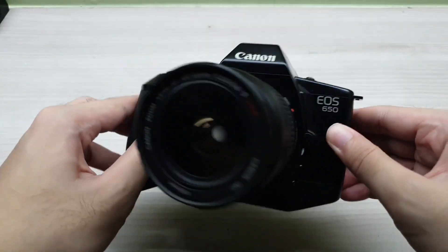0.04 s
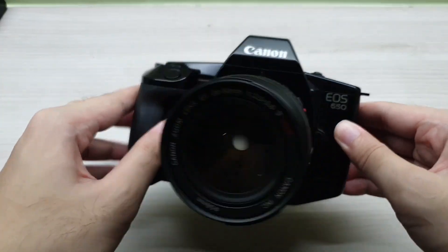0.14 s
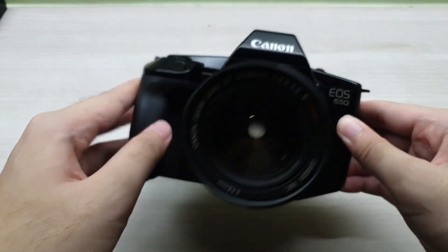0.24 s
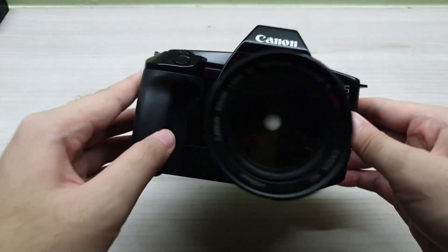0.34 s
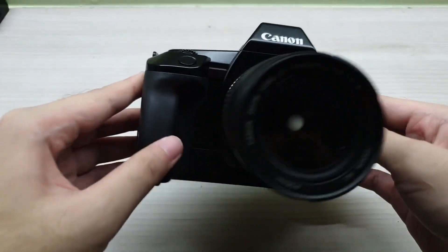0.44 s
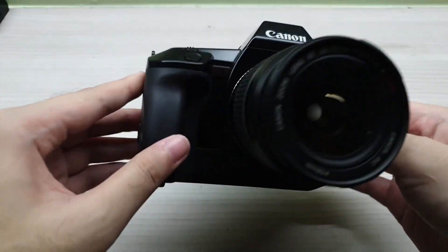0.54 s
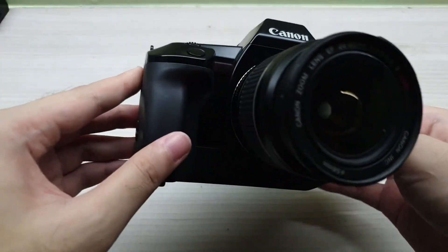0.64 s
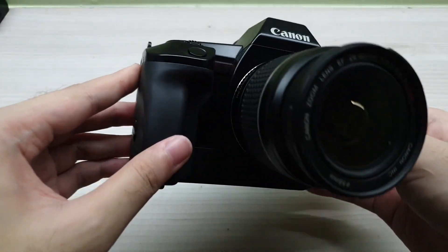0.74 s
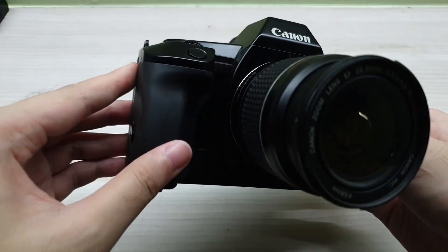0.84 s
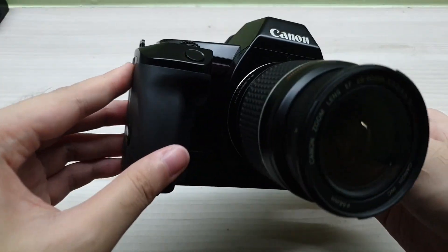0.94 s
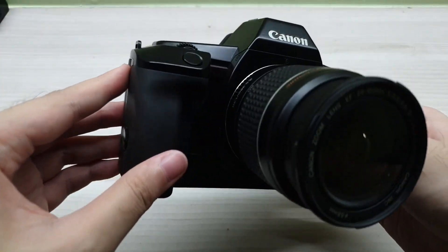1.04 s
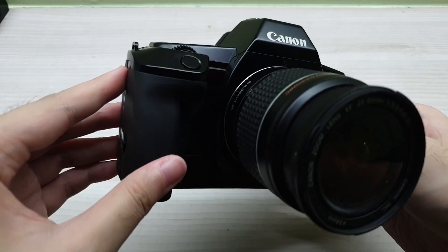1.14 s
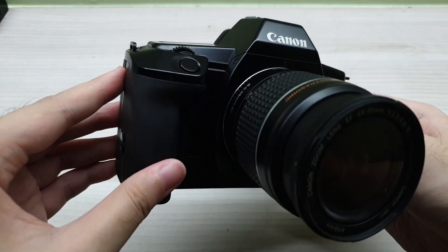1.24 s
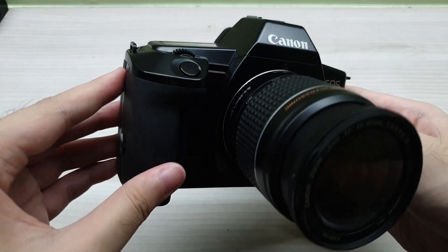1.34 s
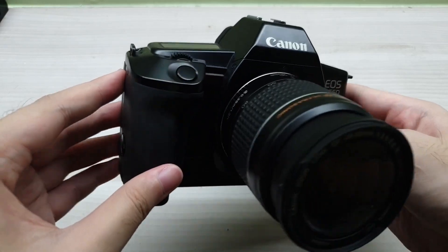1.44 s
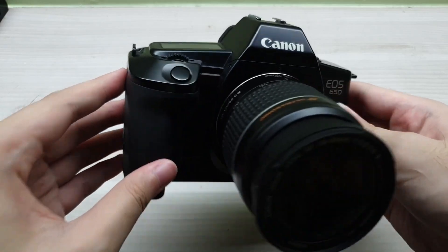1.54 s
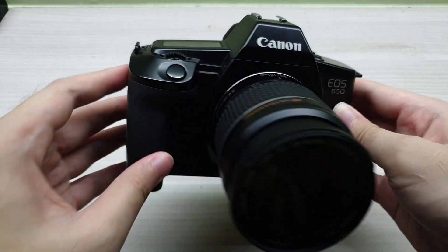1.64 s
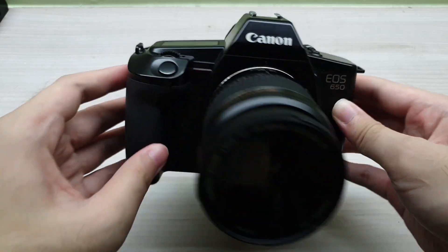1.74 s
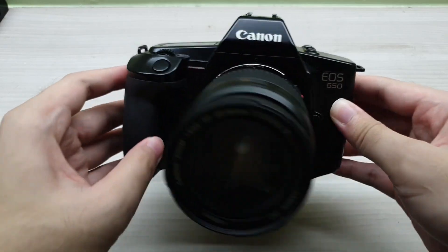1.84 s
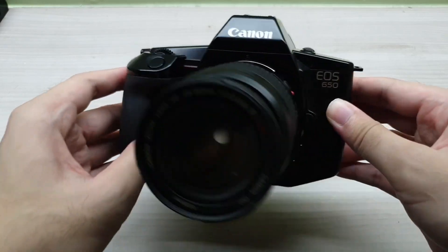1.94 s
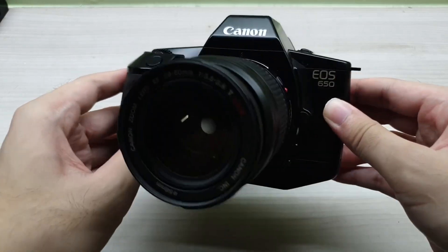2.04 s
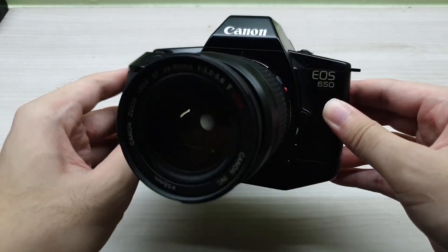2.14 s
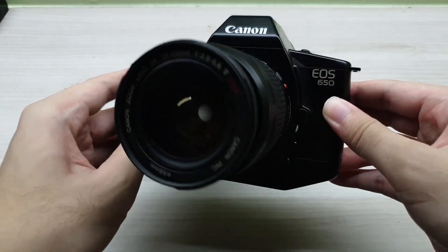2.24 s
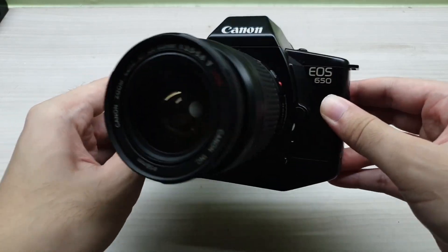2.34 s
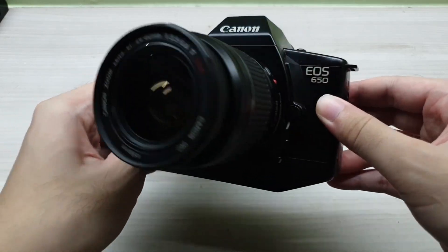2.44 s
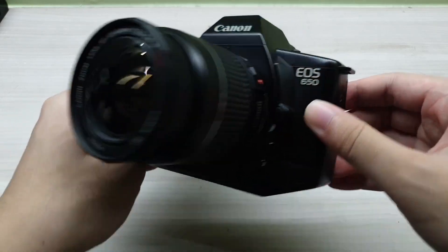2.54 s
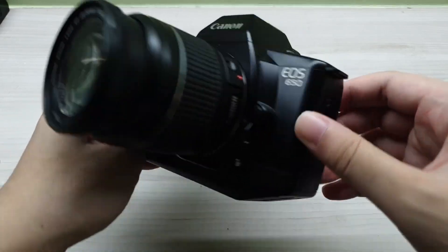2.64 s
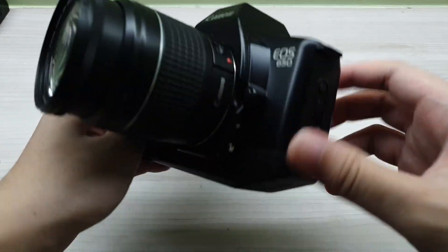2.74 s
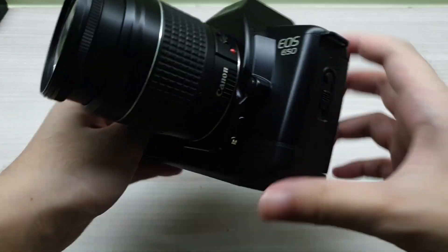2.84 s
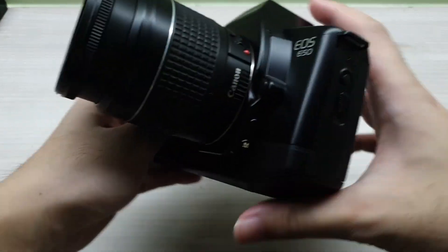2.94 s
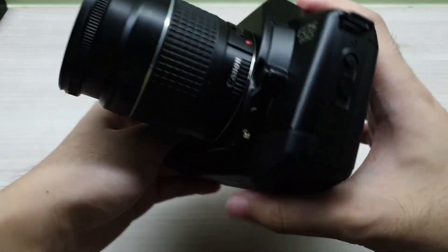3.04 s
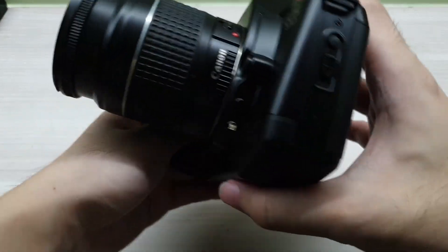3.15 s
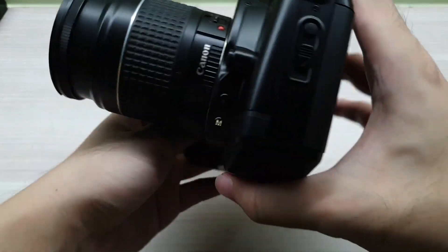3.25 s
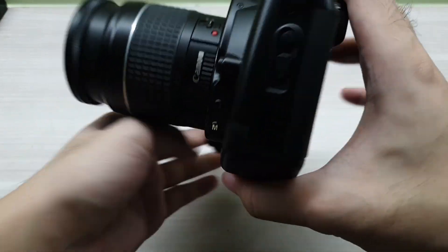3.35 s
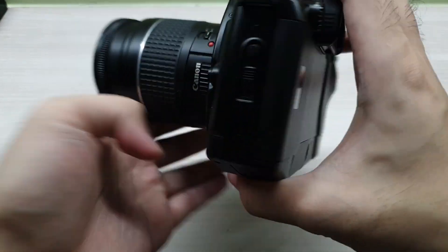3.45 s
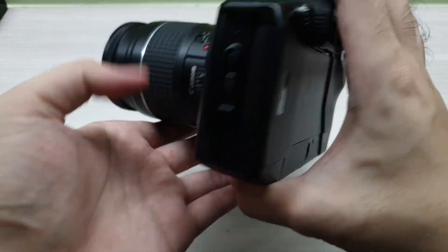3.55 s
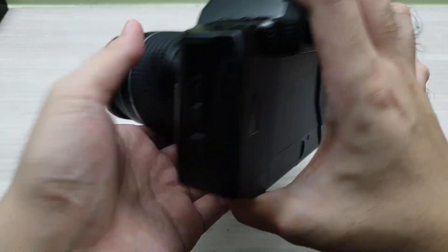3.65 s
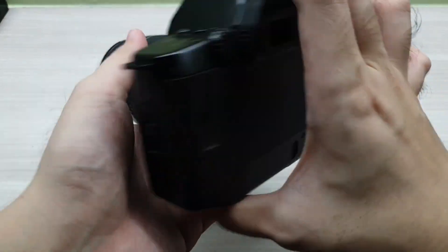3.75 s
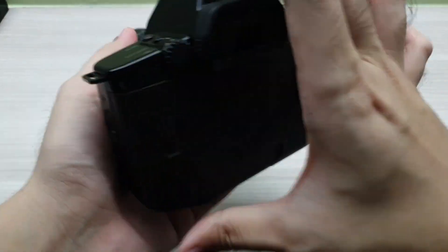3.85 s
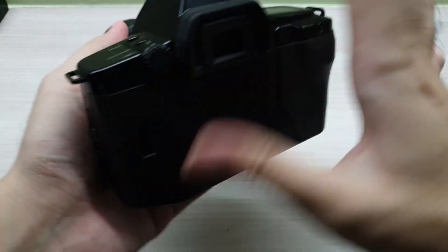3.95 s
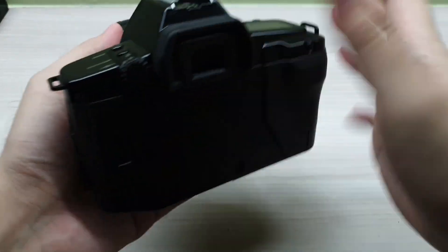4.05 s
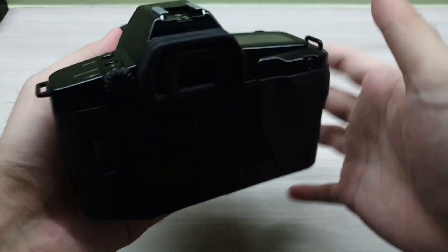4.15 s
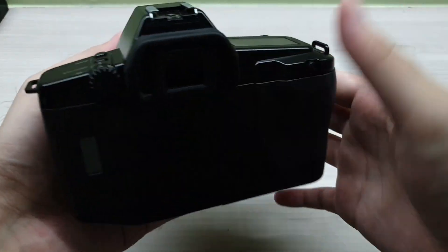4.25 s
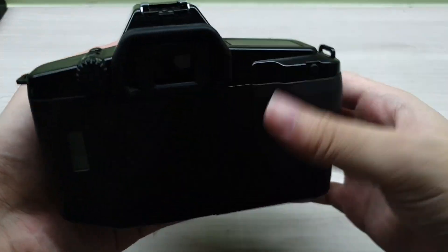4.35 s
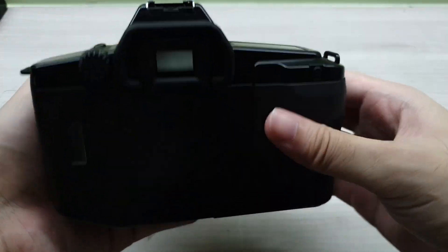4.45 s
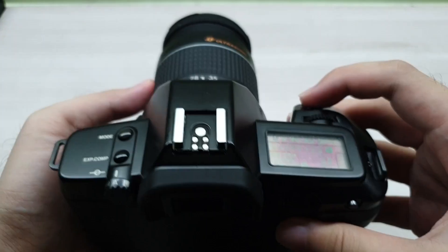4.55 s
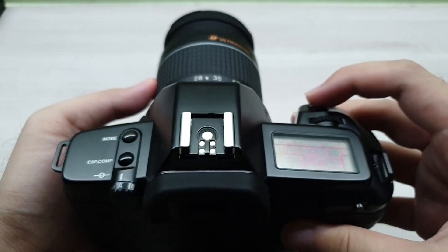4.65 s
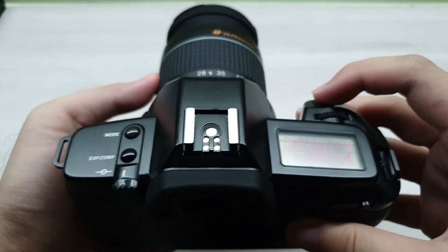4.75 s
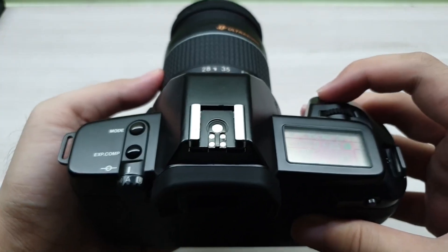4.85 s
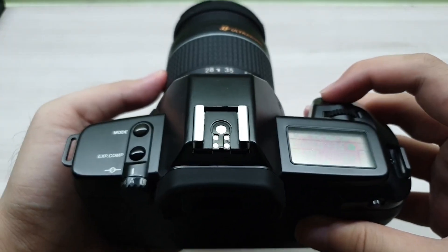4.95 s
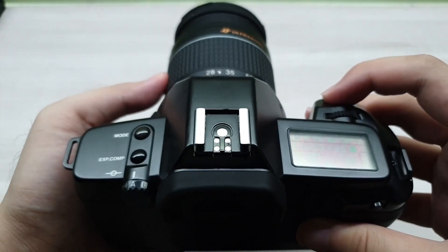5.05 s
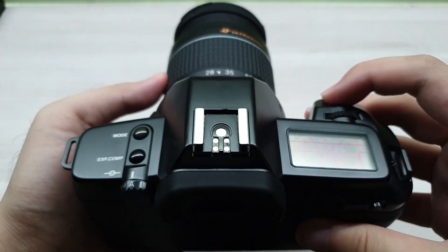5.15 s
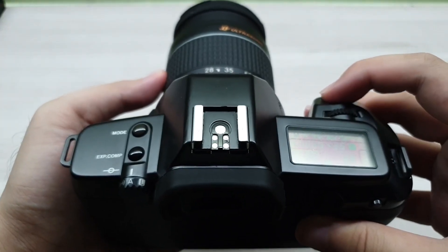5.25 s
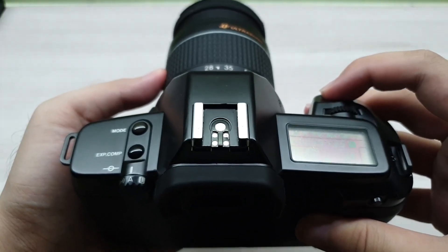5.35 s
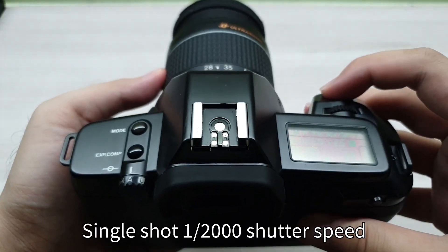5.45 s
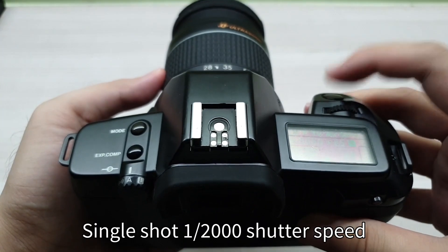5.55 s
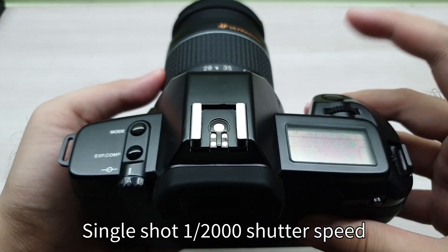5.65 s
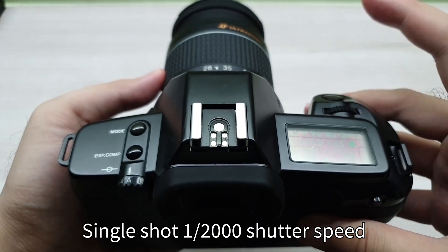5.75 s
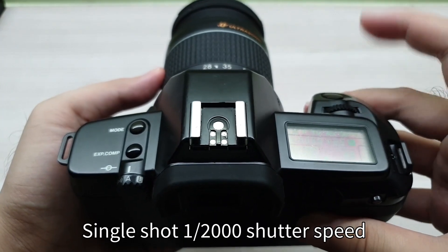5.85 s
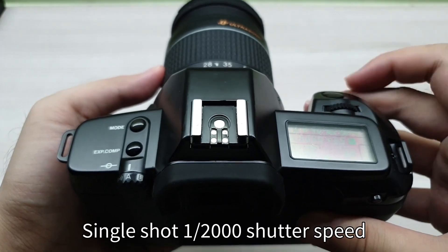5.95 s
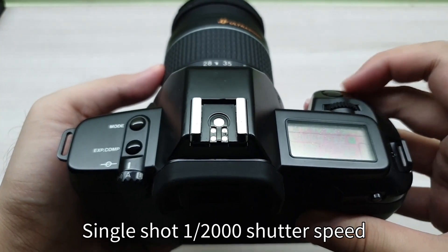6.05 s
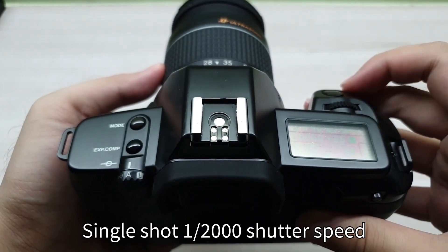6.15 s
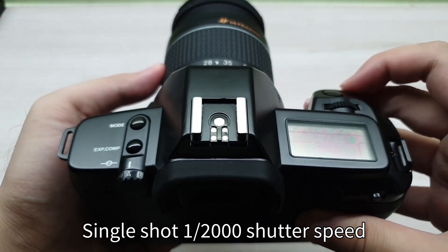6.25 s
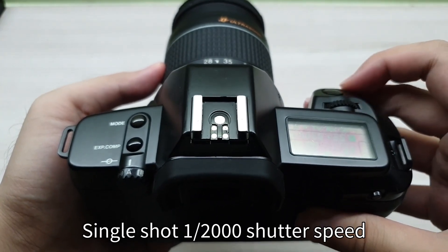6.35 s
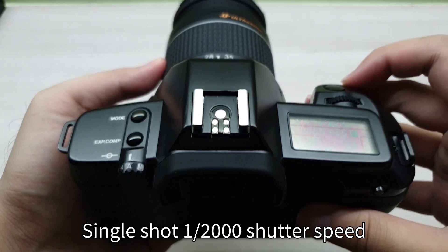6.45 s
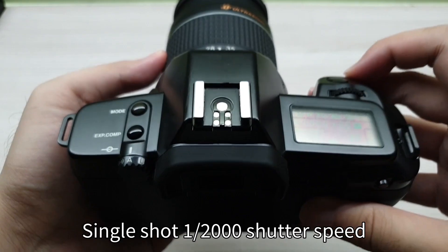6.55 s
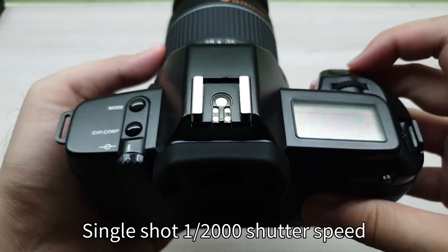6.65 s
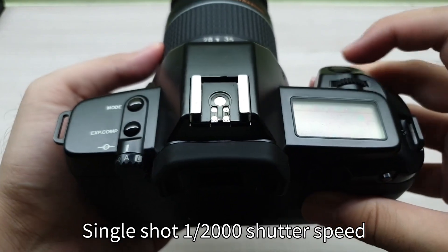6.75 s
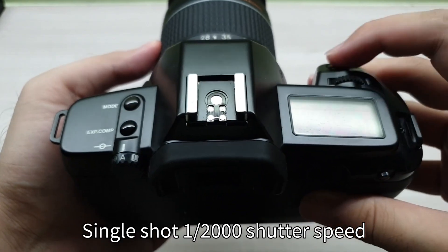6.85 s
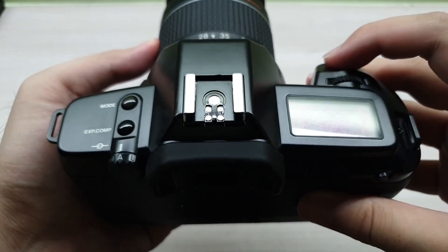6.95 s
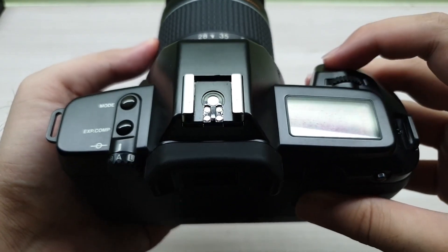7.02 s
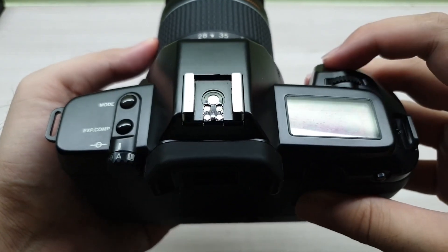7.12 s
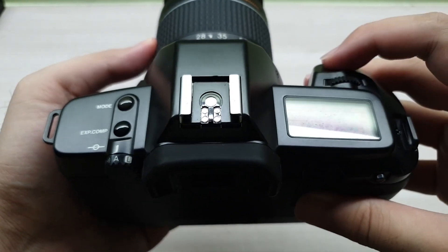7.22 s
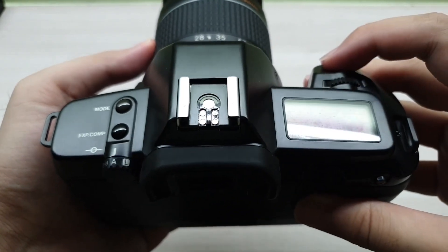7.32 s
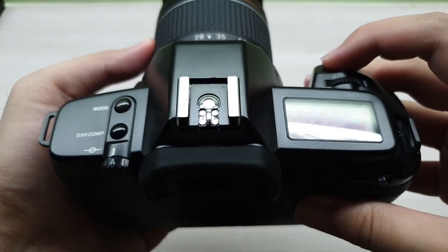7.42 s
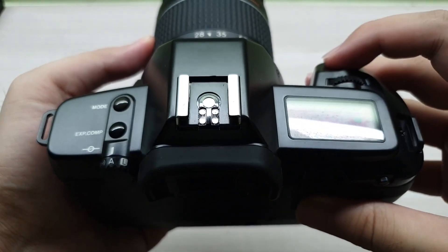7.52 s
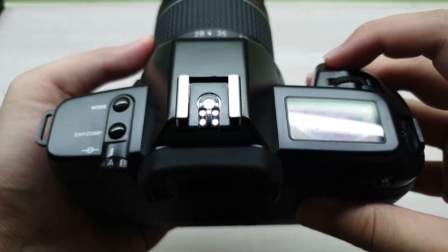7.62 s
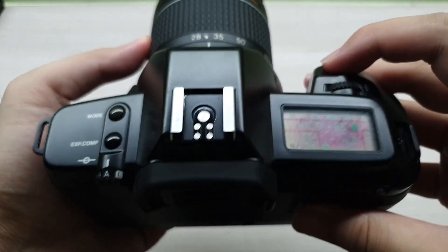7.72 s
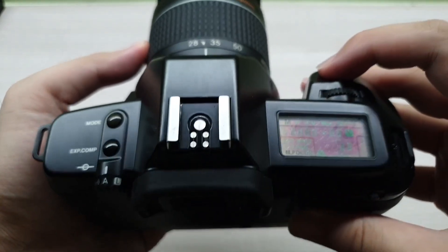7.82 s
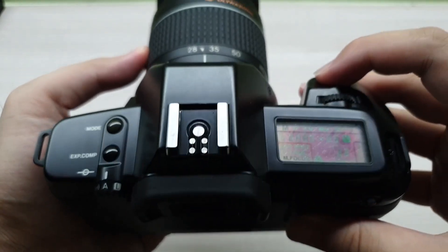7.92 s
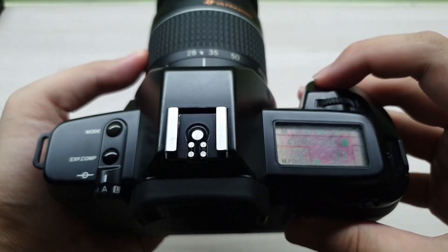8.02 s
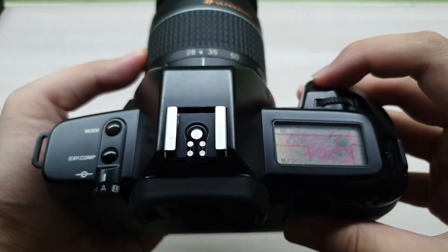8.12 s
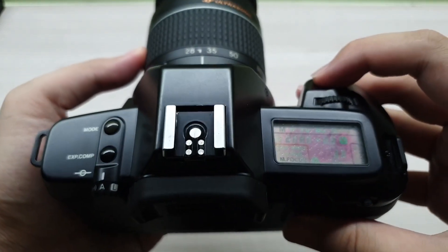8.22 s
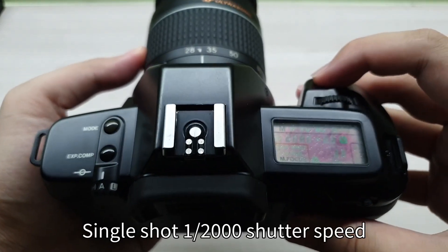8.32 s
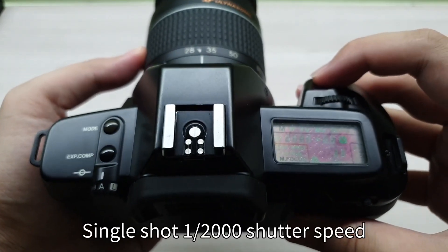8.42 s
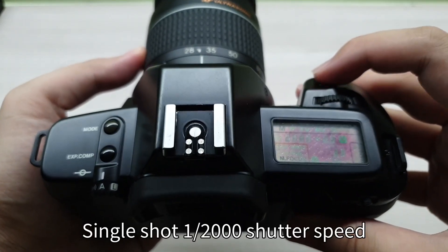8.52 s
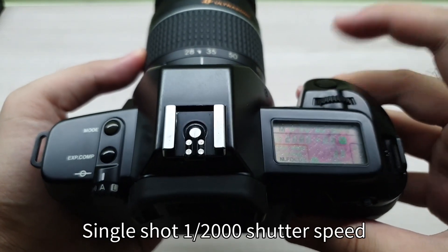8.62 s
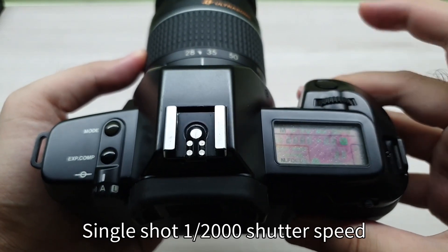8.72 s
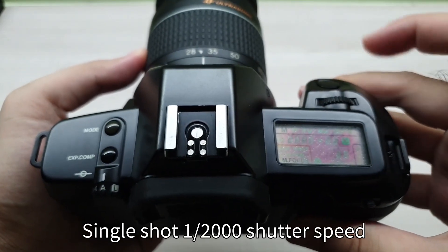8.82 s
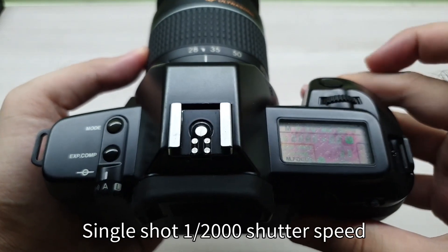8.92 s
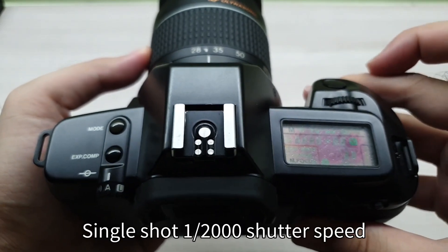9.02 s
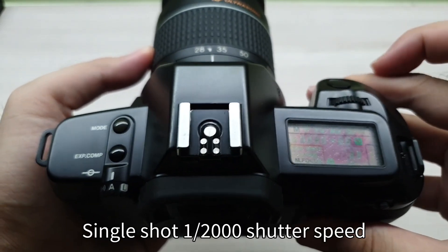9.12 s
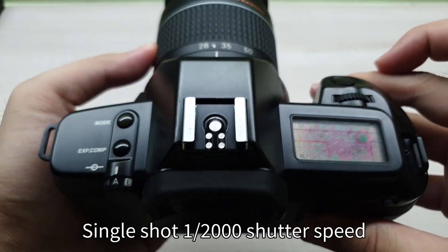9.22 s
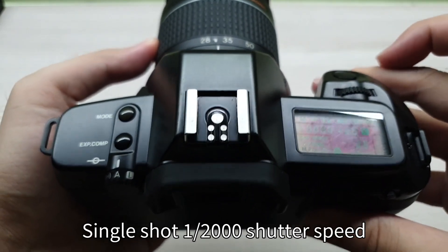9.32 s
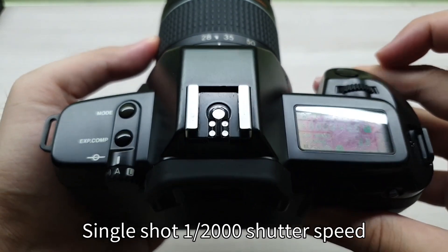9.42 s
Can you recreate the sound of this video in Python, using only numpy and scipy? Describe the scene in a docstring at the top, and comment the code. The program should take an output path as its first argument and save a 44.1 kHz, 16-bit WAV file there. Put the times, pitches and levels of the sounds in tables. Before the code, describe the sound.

A film camera is handled close to the microphone in a small, quiet room with faint steady air. A few soft finger ticks and low bumps come in the first half second, and another tap at about 1.2 seconds. From 2 to 5 seconds the handling gets busier: fingers click and knock on the hollow plastic body, most clearly around 2.6 seconds, and skin rasps briefly over the grip between 2.8 and 4 seconds, ending with soft, deep bumps.

At about 5.4 seconds the camera fires, much louder: a rapid cluster of sharp mirror and shutter clacks overlaps a small geared motor whirring the film on, all within about a third of a second. Light taps follow near 6.1 and 6.8 seconds. At about 8.4 seconds a second, matching clack and whir sounds, with a slight short echo, leaving only faint room air.

```python
"""Fingers tick and slide on plastic in a small, quiet room; then a film camera clacks and whirs, twice.
The camera is turned over in the hands, close to the microphone: touches knock its hollow body,
skin rasps over the grip, and faint room air runs underneath. In each shot a latch trips, the mirror
swings up, the shutter snaps, the mirror drops back, and a small geared motor winds the film on."""
import sys
import numpy as np
from scipy import signal
from scipy.fft import rfft, irfft
from scipy.io import wavfile
from scipy.ndimage import uniform_filter1d

SR = 44100
rng = np.random.default_rng(int(sys.argv[2]) if len(sys.argv) > 2 else 0)


def generate_wav(signal):
    """Clip the signal to [-1, 1] and save it as 16-bit WAV at the path in sys.argv[1]."""
    frames = np.transpose(np.atleast_2d(signal))
    scaled = np.clip(frames, -1, 1) * 32767
    pcm = np.round(scaled).astype(np.int16)
    wavfile.write(sys.argv[1], SR, pcm)


N = 417911
T = np.arange(N) / SR
HIT = T[:8192]  # a short time axis, enough for one hit

# the notes the camera body rings at: (pitch [Hz], relative level [dB], time to fade by 60 dB [s])
BODY_NOTES = [(412, -8, 0.094), (545, -8, 0.081), (672, -6.5, .04), (955, -9.5, 0.04), (1130, -7, 0.069),
              (2310, -1.5, 0.035), (2670, -2.5, .045), (3150, -6.5, .04), (3720, 0, 0.015),
              (4400, -2.5, .04), (6100, -4.5, .05), (6450, -2, 0.044), (7200, -3.5, .05), (9340, -2, 0.03)]
# the two shots: (time [s], relative level [dB])
SHOTS = [(5.3934, -0.5), (8.3529, -0.5)]


def undb(db):
    """Turn decibels into a number to multiply by."""
    return 10 ** (np.asarray(db) / 20)


def unit(x):
    """Scale a sound to an average (rms) level of 1."""
    return x / np.sqrt(np.mean(x ** 2))


def unit_hit(x):
    """Scale a hit to the energy of 4 ms at full level."""
    return x * np.sqrt(.004 * SR / np.sum(x ** 2))


def add(out, s, x):
    """Mix x into out, starting at s seconds."""
    i = int(s * SR)
    out[i:i + len(x)] += x[:N - i]


def noise(size):
    """White noise: an even hiss."""
    return rng.standard_normal(size)


def envelope(attack_s, hold_s, release_s):
    """A loudness shape: rise, hold, then fall by 20 dB in every release time."""
    t = T[:int((attack_s + hold_s + 3 * release_s) * SR)]
    return np.minimum(t / attack_s, 1) * undb(-20 * np.maximum(t - attack_s - hold_s, 0) / release_s)


def colour(x, points):
    """Shape the bass and treble of x along a curve of (frequency [Hz], level [dB]) points."""
    size = 8192
    hz, db = np.transpose(points)
    f = np.maximum(np.arange(size // 2 + 1) * SR / size, 1)
    cepstrum = irfft(np.log(undb(np.interp(np.log(f), np.log(hz), db))))
    # keeping just the first half makes a filter that never sounds ahead of its input
    cepstrum[0] /= 2
    response = irfft(np.exp(rfft(2 * cepstrum[:size // 2], size)))
    return signal.fftconvolve(x, response)[:len(x)]


def ring(x, notes):
    """Let x set notes ringing: (pitch [Hz], level [dB], time to fade by 60 dB [s])."""
    response = np.zeros(len(HIT))
    for hz, db, fade_s in notes:
        detuned_hz = hz * (1 + .0067 * rng.standard_normal())
        response += undb(db) * unit(np.sin(2 * np.pi * detuned_hz * HIT) * undb(-60 * HIT / fade_s))
    return signal.fftconvolve(x, response)[:len(x)]


def contact(rise_s, fall_s):
    """Two surfaces meet in a brief chatter that holds all frequencies about equally."""
    shape = np.minimum(HIT / rise_s, 1) * np.exp(-np.maximum(HIT - rise_s, 0) / fall_s)
    x = noise(len(HIT)) * shape
    for _ in range(3):  # even out the frequencies, then put the loudness shape back
        even = irfft(np.exp(1j * np.angle(rfft(x))))
        loudness = np.sqrt(np.abs(uniform_filter1d(even ** 2, size=24)) + 1e-18)
        x = shape * np.tanh(even / loudness)
    return x


def grit(size, spread_db):
    """Countless tiny slips of unequal strength, up to a second long."""
    return unit(noise(SR) * undb(spread_db * np.minimum(rng.exponential(size=SR), 5)))[:size]


def room_air(air_db=-55, drone_hz=103, drone_db=-67, whistle_hz=8000):
    """Still air with a wavering drone, faint whines and an electronic whistle that comes and goes."""
    # tone of the air: (frequency [Hz], relative level [dB])
    air_tone = [(12, -30), (20, 3.5), (44, -0.5), (65, -13), (107, -8), (204, -18.5), (301, -18.5),
                (446, -20.5), (897, -27), (1150, -27), (2320, -33.5), (3440, -40.5), (7520, -45.5),
                (8180, -46), (16000, -50.5)]
    # the room's steady whines: (pitch [Hz], level [dB])
    whine_notes = [(2300, -80.5), (4527, -88), (6998, -89)]
    # when the whistle sounds: (start [s], hold [s], level [dB])
    whistle_spells = [(.5, 4.6, -90), (4.2, 2.5, -90.5), (7.75, 1.59, -93.5)]
    drone = undb(drone_db) * unit(ring(noise(N), [(drone_hz, 0, .11)]))
    whines = sum(undb(db) * unit(ring(noise(N), [(hz, 0, .04)])) for hz, db in whine_notes)
    swell = np.zeros(N)
    for s, hold_s, db in whistle_spells:
        add(swell, s, undb(db) * envelope(.11, hold_s, .11))
    whistle = np.sqrt(2) * np.sin(2 * np.pi * whistle_hz * T) * swell
    return undb(air_db) * unit(colour(noise(N), air_tone)) + drone + whines + whistle


def finger_taps(touch_s=.0025):
    """A touch knocks the hollow body, clicks the shell and ticks on its surface, each spot at its pitch."""
    # fingers tapping and the casing creaking, with a relative level for each of four layers:
    # (time [s], knock [dB], click [dB], tick [dB], sharp edge [dB], knock pitch [Hz], click pitch [Hz])
    touches = [(0.197, -56, -58, -66, -60, 1110, 3600), (0.227, -69, -47, -60, -55, 450, 3050),
               (0.239, -53, -53.5, -66, -58, 403, 5160), (0.432, -71, -62, -59.5, -61, 350, 4590),
               (1.211, -56, -48.5, -83, -78, 530, 1920), (1.9407, -42, -60.5, -68, -67, 744, 1870),
               (2.022, -53, -40, -46.5, -40, 760, 4270), (2.317, -60, -47.5, -68, -67, 745, 3170),
               (2.334, -55, -50, -66, -71, 1120, 3150), (2.365, -48.5, -50.5, -52, -54, 760, 5200),
               (2.551, -42.5, -60, -79, -80, 430, 1940), (2.57, -33.5, -44, -43.5, -43, 470, 3900),
               (2.666, -41, -38, -48, -53, 1120, 2760), (2.75, -47, -66, -70, -75, 468, 1840),
               (2.803, -42.5, -56, -70, -76, 606, 2260), (2.813, -44.5, -47, -66, -77, 750, 1960),
               (3.102, -52.5, -51, -77, -79, 706, 1590), (3.155, -55, -53.5, -52, -54, 410, 5200),
               (3.23, -41.5, -41.5, -56, -53, 470, 1530), (3.244, -41.5, -44, -59, -66, 485, 1770),
               (3.26, -49, -47.5, -63, -66, 700, 5260), (3.289, -53.5, -57, -57, -55, 720, 5270),
               (3.491, -47, -43.5, -62, -57, 405, 5100), (3.917, -52, -58, -54, -52.5, 302, 2210),
               (4.059, -40.5, -58, -88, -88, 380, 2220), (4.316, -56, -58.5, -67, -80, 345, 1800),
               (4.655, -46.5, -56.5, -72, -74, 425, 2270), (4.7605, -52.5, -46, -43.5, -74, 526, 3100),
               (4.876, -66, -56.5, -55, -62, 315, 2190), (6.146, -51.5, -56, -64, -66, 960, 1890),
               (6.7723, -59, -43.5, -52.5, -49.5, 878, 2190), (6.798, -60.5, -56, -68.5, -66, 285, 1570)]
    knock_tone = [(80, 3), (250, -2), (400, 3.5), (750, 4.5), (1200, -8.5), (2500, -18), (6000, -48)]
    click_tone = [(400, -26.5), (1200, -4), (2000, -3), (3100, 1), (4800, -1.5), (8000, -21),
                  (15000, -54)]
    tick_tone = [(1500, -36), (4500, -6.5), (6800, 5), (8600, -5.5), (11000, -26), (15500, -26)]
    edge_tone = [(3000, -59), (8000, 2), (10500, -4.5), (15500, -14)]
    # the shell's notes: (pitch [times the click pitch], relative level [dB])
    shell = [(.73, -27), (1, 12), (1.14, 13), (1.55, 7.5)]
    out = np.zeros(N)
    for s, knock_db, click_db, tick_db, edge_db, knock_hz, click_hz in touches:
        knock = unit_hit(colour(contact(touch_s / 2, 1.41 * touch_s), knock_tone))
        knock += unit_hit(ring(knock, [(knock_hz, 0, .036)]))
        click = unit_hit(colour(contact(touch_s / 2, touch_s), click_tone))
        click += unit_hit(ring(click, [(click_hz * ratio, db, .01) for ratio, db in shell]))
        tick = colour(contact(.4 * touch_s, .7 * touch_s), tick_tone)
        edge = colour(contact(.54 * touch_s, touch_s / 2), edge_tone)
        layers = [(knock, knock_db), (click, click_db - 1), (tick, tick_db - 1), (edge, edge_db - 1)]
        add(out, s, sum(undb(db) * unit_hit(x) for x, db in layers))
    return out


def grip_bumps(gain_db=-2):
    """Each shift of the hands stirs a short, deep rumble."""
    # shifts of the grip: (time [s], relative level [dB])
    shifts = [(.2, -46), (0.271, -47), (.355, -40), (3.666, -35), (3.745, -32), (3.783, -33.5),
              (3.901, -39), (3.975, -37)]
    rumble_tone = [(10, 2), (28, 0), (55, -13), (90, -19), (160, -33), (600, -60), (3000, -90)]
    bump = envelope(attack_s=.0145, hold_s=.0208, release_s=.048)
    out = np.zeros(N)
    for s, db in shifts:
        rumble = colour(noise(2 * SR), rumble_tone)[-len(bump):]
        add(out, s, undb(db + gain_db) * bump * unit(rumble))
    return out


def skin_slides(spread_db=3.5, catch_db=1.5, ease_db_per_s=95, lift_s=.058):
    """Skin catches and slips over the textured grip in tiny steps, eases its pressure, then lifts off."""
    # strokes of skin; a light fingertip sounds thinner than a palm:
    # (time [s], rise [s], hold [s], relative rasp level [dB], hiss level [dB], low end of the rasp [Hz])
    strokes = [(0.282, 0.052, 0.037, -77, -72, 3500), (1.944, .02, 0.035, -66, -71, 600),
               (2.797, 0.01, 0.0051, -54.5, -66, 600), (2.953, 0.044, 0.057, -46.5, -48, 2690),
               (3.223, 0.0038, .13, -55.5, -55.5, 1700), (3.467, 0.025, 0.14, -56.5, -53, 2500),
               (3.742, 0.039, 0.052, -55.5, -58, 1330), (3.824, 0.047, .02, -50, -57.5, 1440),
               (4.433, 0.018, 0.028, -73, -72, 3500)]
    rasp_tone = [(1000, 7.5), (2400, 9.5), (3300, 7.5), (4200, 1.5), (5300, 6.5), (6300, -1),
                 (8000, -16), (15000, -21)]
    hiss_tone = [(2000, -41), (5500, 4), (7200, 8), (10000, 2.5), (15500, -3.5)]
    out = np.zeros(N)
    for s, attack_s, hold_s, rasp_db, hiss_db, low_hz in strokes:
        pressure = envelope(attack_s, hold_s, lift_s)
        size = len(pressure)
        pressure *= undb(-ease_db_per_s * np.maximum(T[:size] - attack_s, 0))
        catch = undb(catch_db * unit(uniform_filter1d(noise(SR), size=150))[:size])
        rasp = colour(catch * grit(size, spread_db), rasp_tone)
        rasp = signal.sosfilt(signal.butter(5, low_hz, "high", fs=SR, output="sos"), rasp)
        hiss = colour(catch * grit(size, spread_db), hiss_tone)
        add(out, s, pressure * (undb(rasp_db - 1) * unit(rasp) + undb(hiss_db) * unit(hiss)))
    return out


def strap_fitting(time_s=2.571, level_db=-55):
    """One knock sets a small metal fitting ringing faintly."""
    metal_notes = [(2900, -10, .2), (3480, -10, .2), (5010, 0, .22)]
    out = np.zeros(N)
    add(out, time_s, undb(level_db) * unit_hit(ring(contact(.0002, .0003), metal_notes)))
    return out


def shutter_and_mirror(ring_db=-8, thud_db=-11):
    """Each part chatters against its stop and rings the body; the falling mirror shakes the camera."""
    # the blows in a shot: (time into the shot [s], relative level [dB], rise [s], fall [s], part [name])
    blows = [(0, -17.5, 0.0022, .0022, "latch"), (.05, -24, .002, .0024, "latch"),
             (.0574, -18.5, 0.0027, .0035, "lever"), (.0667, -11.5, .0022, .0036, "mirror_up"),
             (.0738, -16, 0.00079, .0027, "lever"), (.0978, -17, .0016, .003, "lever"),
             (.1056, -11, .0025, .002, "shutter"), (.1372, -21, .0026, .0019, "lever"),
             (.1665, -10.5, 0.0013, .0016, "mirror_down"), (0.1919, -17, .0024, .0043, "mirror_down"),
             (.2118, -27, .002, .003, "latch")]
    # tone of each part, by name: (frequency [Hz], relative level [dB])
    part_tones = {"latch": [(88, -63), (150, -30.5), (414, -19), (854, -21.5), (1500, -1.5), (2140, -10),
                  (2760, 3.5), (3840, -13.5), (6640, -8.5), (7320, -3), (11000, -14.5), (14800, -13.5),
                  (16000, -24.5)], "lever": [(88, -33.5), (150, -13), (1310, -6.5), (2700, -6),
                  (4160, -4.5), (6640, -2), (10000, -1), (11000, -5.5), (11900, -3), (14500, -12),
                  (16000, -13.5)], "mirror_up": [(60, -4.5), (350, -18.5), (560, -4.5), (800, -21),
                  (1600, -16.5), (2150, -0.5), (2800, -6.5), (3600, 2.5), (4200, -12), (5000, -13.5),
                  (6600, -2), (9000, -14), (11500, -13.5), (15500, -10)], "shutter": [(60, -13.5),
                  (300, -15.5), (550, -1.5), (850, -15.5), (1300, 0), (1650, -22.5), (2330, 2.5),
                  (2800, -4.5), (3650, -2.5), (5200, -10.5), (7400, -14), (11000, -17), (15500, -16)],
                  "mirror_down": [(40, 0), (270, -4.5), (410, 0), (750, -3.5), (1300, -6.5), (1800, -2),
                  (2700, -1.5), (3900, -7.5), (5200, -9), (6300, 0.5), (8000, -5), (9300, -1),
                  (11500, -11.5), (15500, -11)]}
    thud_notes = [(44.7, -6, .13), (115, -1.5, .08), (269.8, -2.5, .025), (412, -.5, .027)]
    out = np.zeros(N)
    for shot_s, shot_db in SHOTS:
        for after_s, blow_db, rise_s, fall_s, part in blows:
            s, db = shot_s + after_s, shot_db + blow_db
            clack = unit_hit(colour(contact(rise_s, fall_s), part_tones[part]))
            body = undb(ring_db) * unit_hit(ring(clack, BODY_NOTES))
            add(out, s, undb(db) * (clack + body))
            if part == "mirror_down":
                add(out, s, undb(db + thud_db) * unit_hit(ring(clack, thud_notes)))
    return out


def winding_motor(full_hz=177, spin_up_s=.0026, brake_hz_per_s=1800, wobble=.007, throb=.083):
    """Gears whine at multiples of the shaft speed, rattle harder once a turn and shake the body."""
    # the shaft slows while it tightens the springs: (time into the shot [s], turns per second [Hz])
    shaft_speeds = [(.016, 121.4), (.04, 146.5), (.066, 177), (.087, 181.1), (.121, 144.6), (.174, 177.9),
                    (.267, 176), (.29, 168), (.316, 173.5)]
    # notes from the motor's three poles and fifteen gear teeth, and their neighbours:
    # (pitch [times the shaft speed], relative level [dB])
    whine_notes = [(1, -16.5), (3, -8.5), (5, -17.5), (6, -13), (9, -17.5), (10, -8), (11, -13), (13, -2.5),
                   (14, -3), (15, 4), (16, -13), (17, -17.5), (18, -5), (21, -9.5), (25, -14), (34, -15.5),
                   (37, -8.5), (40, -18)]
    # tone of the rattling gears: (frequency [Hz], relative level [dB])
    gear_tone = [(60, -24), (280, -24.5), (420, -5.5), (750, -12), (1020, -5.5), (1300, -11.5),
                 (2000, -4.5), (2600, 0.5), (3500, -3), (3950, -10), (4400, -8.5), (4900, -10), (6700, -1),
                 (9700, -8.5), (11500, -18.5), (15500, -24.5)]
    teeth = np.sign(noise(256))
    start_s, stop_s = shaft_speeds[0][0], shaft_speeds[-1][0]
    power = np.pad(envelope(spin_up_s, stop_s - start_s - spin_up_s, release_s=.016), (0, len(HIT)))
    t = start_s + T[:len(power)]
    braking_hz = brake_hz_per_s * np.maximum(t - stop_s, 0)
    shaft_hz = np.maximum(np.interp(t, *np.transpose(shaft_speeds)) - braking_hz, full_hz / 2)
    gain = power * undb(-28 + 3.5 * np.log2(shaft_hz / full_hz))  # a slower shaft is quieter
    # while the mirror moves, the gears are under load: they whine less and judder more
    load = np.clip(1 - (t - .165) / .031, 0, 1)
    whine_db = -.5 - 5.5 * load
    out = np.zeros(N)
    for shot_s, shot_db in SHOTS:
        judder = wobble * undb(-whine_db) * unit(uniform_filter1d(noise(SR), size=160))[:len(t)]
        turns = np.cumsum(shaft_hz * (1 + judder)) / SR
        angle = 2 * np.pi * turns
        whine = unit(sum(undb(db) * np.sin(multiple * angle + rng.uniform(0, 2 * np.pi))
                         for multiple, db in whine_notes))
        # the same uneven teeth meet on every turn; the slack between them adds random grit
        tooth = (turns % 1 * len(teeth)).astype(int)
        chatter = undb(-3) * teeth[tooth] + grit(len(t), spread_db=1.4)
        rattle = gain * unit(colour(chatter * np.exp(throb * np.cos(angle)), gear_tone))
        body = undb(-8) * np.std(rattle) * unit(ring(rattle, BODY_NOTES))
        add(out, shot_s + start_s, undb(shot_db) * (rattle + body + gain * undb(whine_db) * whine))
    return out


def room_echo(x, early_db=-14, early_s=.024, tail_db=-20, tail_s=.62):
    """The table top throws the sound back at once; the walls add a short, bright tail."""
    wall_tone = [(100, -11), (500, -7.5), (1200, 3.5), (2600, -8), (7000, .5), (10000, -2.5),
                 (15000, -3.5)]
    t = T[:SR]
    early = noise(SR) * np.exp(-t / early_s) * (t > .002)
    tail = colour(noise(SR), wall_tone) * undb(-60 * t / tail_s) * np.minimum(t / .005, 1)
    dull = signal.sosfilt(signal.butter(4, 9000, fs=SR, output="sos"), tail)
    tail = dull + (tail - dull) * np.exp(-t / .27)  # the highest treble dies away sooner
    response = (undb(early_db) * unit(early) + undb(tail_db) * unit(tail)) / np.sqrt(SR)
    return signal.fftconvolve(x, response)[:N]


def stereo_width(x, side_db=-10, smear_s=.004):
    """Spread the treble of the clicks slightly to the left and right."""
    smear = noise(len(HIT)) * np.exp(-HIT / smear_s)
    treble = signal.sosfiltfilt(signal.butter(6, 5000, "high", fs=SR, output="sos"), x)
    return undb(side_db) * signal.fftconvolve(treble, smear / np.linalg.norm(smear))[:N]


def scene():
    """Camera and hands sit in the middle; only the sharp clicks spread to the left and right."""
    clicks = shutter_and_mirror() + finger_taps()
    camera = clicks + winding_motor() + strap_fitting() + skin_slides()
    middle = camera + room_echo(camera) + grip_bumps() + room_air()
    side = stereo_width(clicks)
    return np.array([middle + side, middle - side])


def record(dry):
    """Clip any peak past full level and cut the treble above 16100 Hz."""
    treble_cut = signal.ellip(10, .1, 70, 16100, fs=SR, output="sos")
    return signal.sosfilt(treble_cut, np.clip(dry, -1, 1))


dry = scene()
out = record(dry)
generate_wav(out)
```